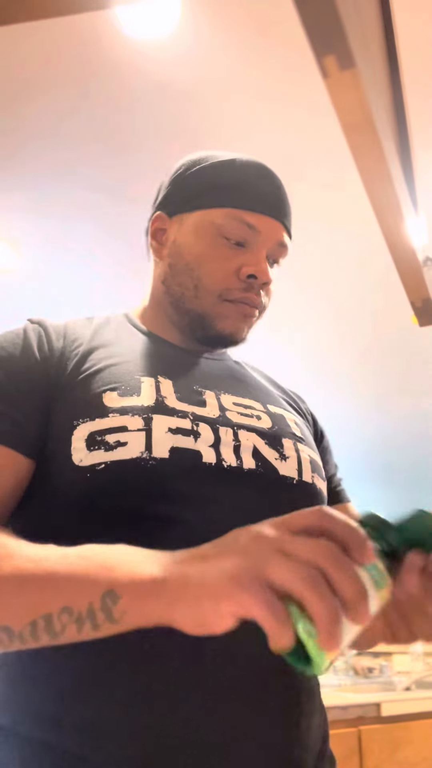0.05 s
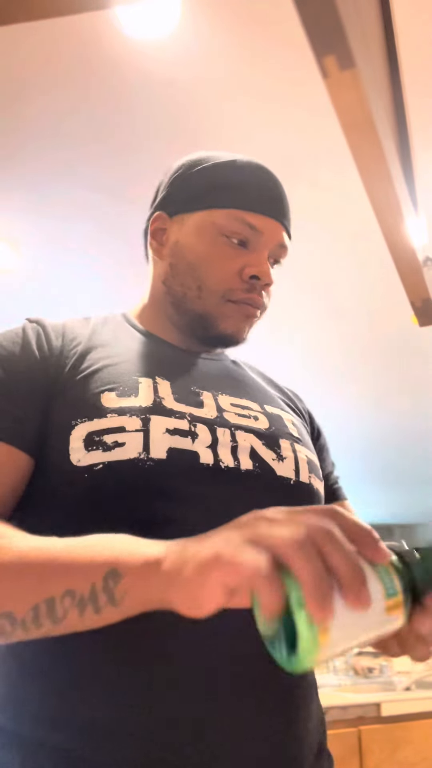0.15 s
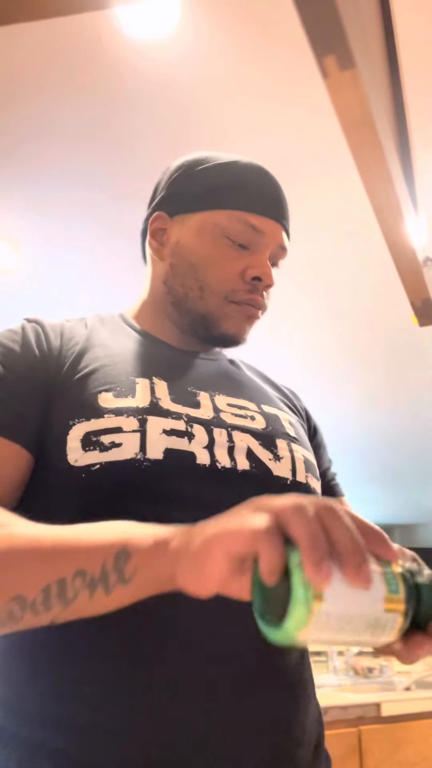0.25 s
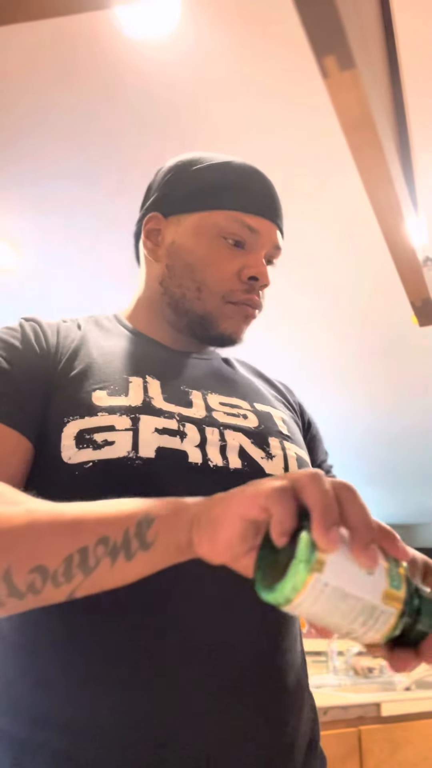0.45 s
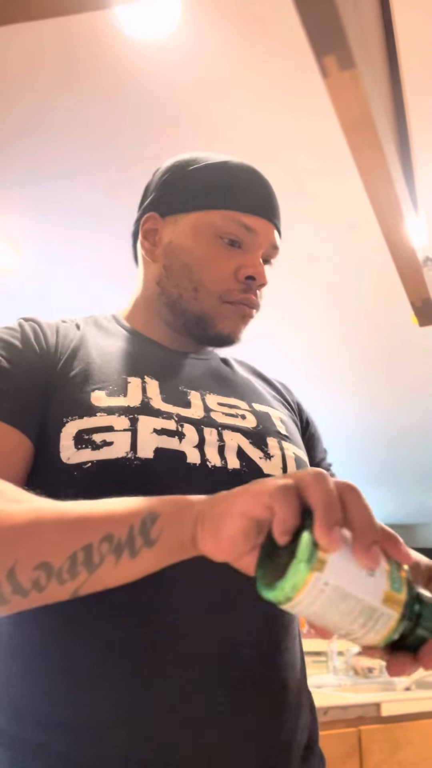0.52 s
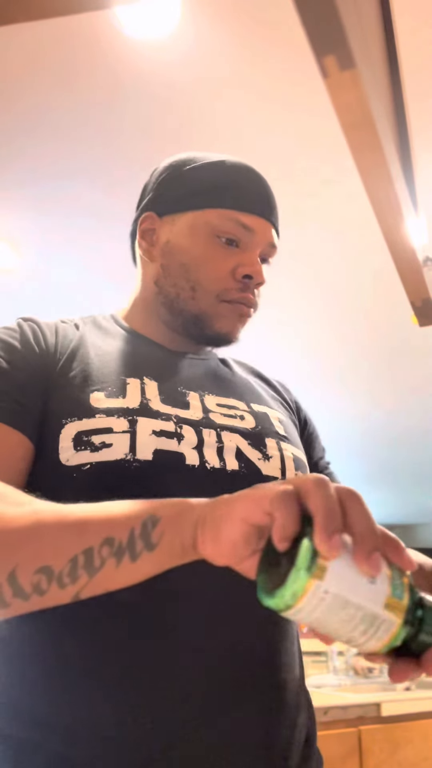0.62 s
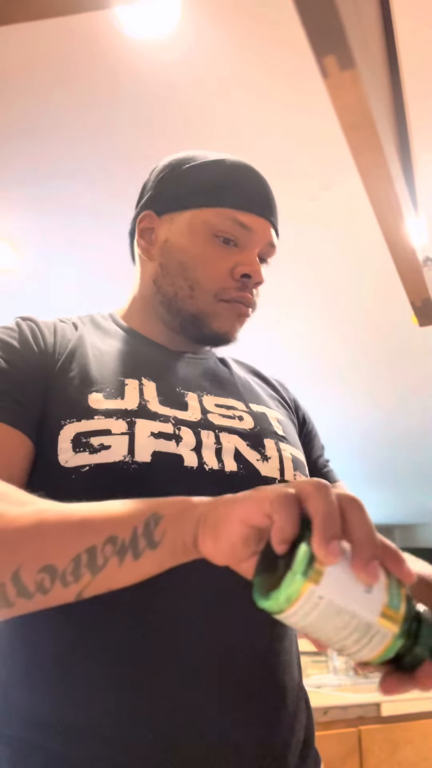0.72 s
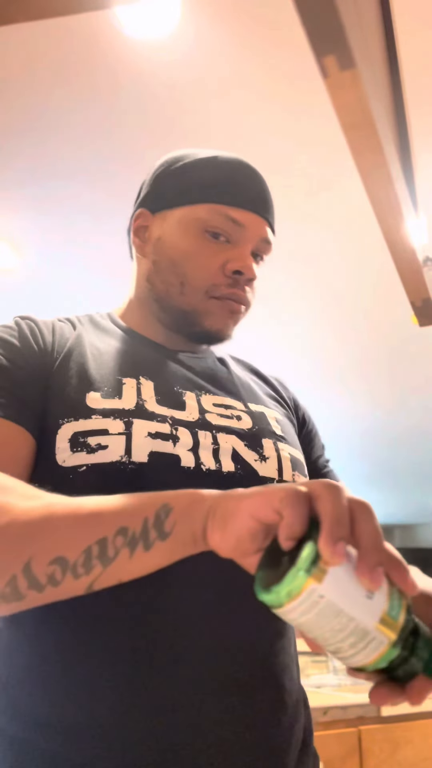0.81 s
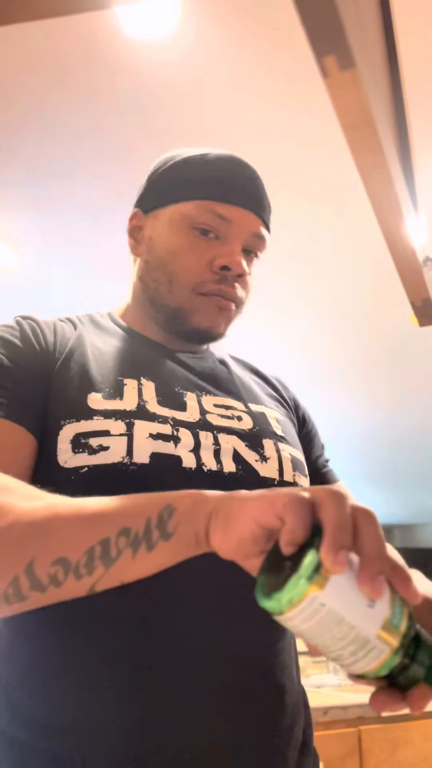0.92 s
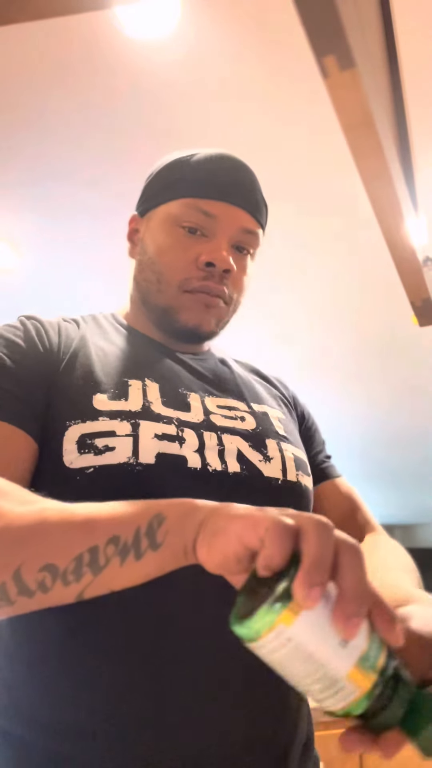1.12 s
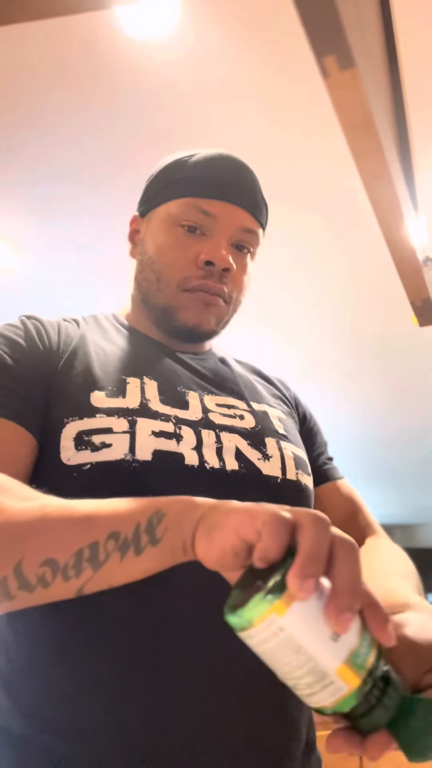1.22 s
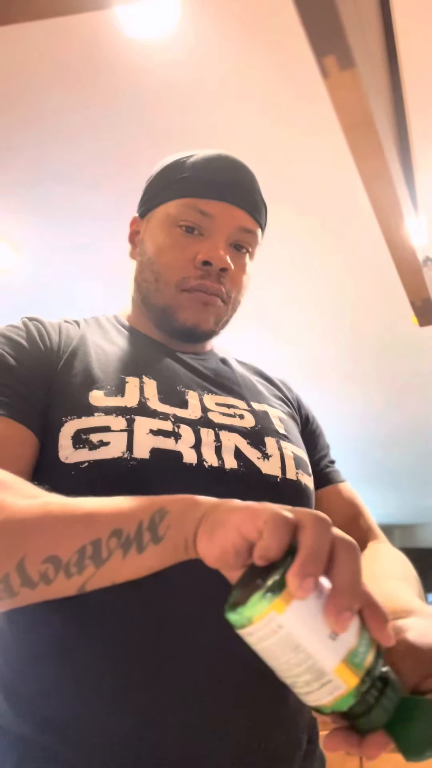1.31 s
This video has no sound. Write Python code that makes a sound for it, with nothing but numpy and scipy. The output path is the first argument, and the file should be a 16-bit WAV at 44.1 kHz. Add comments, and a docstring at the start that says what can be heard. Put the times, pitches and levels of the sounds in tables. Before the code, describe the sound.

Tablets rattle and clatter down inside a plastic bottle, then a few last ones tick out

```python
"""Tablets tipped from a plastic bottle

A pill bottle is uncapped and tipped in a kitchen, close to a pair of microphones, over a low rumble of shaped noise.
The rubbing cap sets the hollow bottle humming: two narrow gliding notes.
Tablets slide and knock down the wall, then a last few drop out: clicks excite cracks, ticks and decaying modes.
A hand rubs the bottle (grainy noise) and bumps it once (a low sine and low noise)."""
import sys
import numpy as np
from scipy import signal
from scipy.fft import rfft, irfft
from scipy.io import wavfile
from scipy.ndimage import uniform_filter1d

SR = 44100
rng = np.random.default_rng(int(sys.argv[2]) if len(sys.argv) > 2 else 0)


def write(x):
    x = np.atleast_2d(x).T
    wavfile.write(sys.argv[1], SR, np.round(np.clip(x, -1, 1) * 32767).astype(np.int16))


N = 59535  # length in samples

# Spectrum of the room rumble: frequency_hz, relative_density_db
RUMBLE_SPECTRUM = [(20,-17.5),(40,-8),(60,1.5),(90,-0.5),(125,-12.5),(160,-20),(200,-8.5),(250,-34.5),(450,-17.5),(1000,-45.5),(2500,-39),(9000,-38.5),(16000,-68.5)]
RUMBLE_DB = -60.5

# Levels of the two notes of the rubbing cap: time_s, low_note_db, high_note_db
CAP_LEVELS = [(0,-50,-51.5),(.075,-48.5,-41.5),(.1,-61,-66),(.17,-64,-66),(.21,-61.5,-41),(.285,-55,-34.5),(.35,-60,-40.5),(.42,-94.5,-80.5)]
# The two notes, low then high: start_pitch_hz, glide_hz_per_s, linewidth_hz
CAP_NOTES = [(476,-81,3.1),(1812,105,2.6)]

# Skin rubbing on the bottle: time_s, level_db
RUB_LEVEL = [(0,-49),(.09,-58.5),(.85,-72.5),(.92,-54.5),(.98,-53.5),(1.05,-53),(1.12,-46.5),(1.22,-53.5),(1.275,-60.5),(1.33,-50)]
# Spectrum of the rub: frequency_hz, relative_density_db
RUB_SPECTRUM = [(200,-24),(320,0),(520,-1.5),(750,2),(1000,-6.5),(1500,3),(2300,-2.5),(2900,-6.5),(6000,-24),(16000,-38.5)]
# Spectrum of the noise in the bump: frequency_hz, relative_density_db
PUFF_SPECTRUM = [(30,2),(90,2),(160,-8),(300,-11),(520,-8.5),(900,-53)]
BUMP_S, BUMP_RISE_S, BUMP_HZ = 0.948, 0.016, 78  # onset, time from onset to peak, pitch
BUMP_DB, BUMP_PUFF_DB = -48, -48  # sine and noise parts

# Small tablets sliding over each other: time_s, relative_level_db
SLIDE_LEVEL = [(0,-55),(.07,-50),(.1,-67),(.17,-51),(.235,-43),(.255,-30.5),(.31,-24),(.365,-26.5),(.41,-18),(.46,-25),(.51,-25),(.57,-36),(.72,-44),(.78,-50),(1.07,-69),(1.09,-37),(1.13,-66)]
SLIDE_PER_S, SLIDE_SPREAD_DB, SLIDE_DB = 340, 1.3, -2
SLIDE_TREBLE_DB, SLIDE_TICK_HZ = -10, 3500

# Tablet knocks: start_s, relative_level_db, relative_treble_db, tick_pitch_hz
KNOCKS = [(.015,-38,-7,3770),(.0362,-22.5,-4,3650),(.0516,-23,1,3915),(.1775,-32,-14,3770),(.2034,-24.5,-11,3700),
          (.2418,-13.5,-1.5,3570),(.2618,-15,3,4130),(.275,-17,3,3540),(.2995,-13.5,1,3730),(.305,-16.5,4,3602),(.316,-18,-9,3630),(.3444,-10,7.5,5500),
          (.3855,-21,3.5,3400),(.398,-12.5,-1,3700),(.4055,-11.5,5,4325),(.410,-12.5,0.5,3310),(.4212,-6.5,-1.5,3570),(.427,-17,-9,4620),(.4633,-12,-8,2360),(.4823,-14,-12.5,3660),
          (.5387,-16,-6,2540),(.5546,-14.5,2,2340),(.5891,-23.5,3,5050),(.6095,-20,0,2473),(.633,-20,-7,3570),(.6384,-16,-1.5,2515),(.6645,-29,-15,4100),(.686,-12,7.5,4280),(.7148,-23,-6,2550),(.756,-34.5,-21,2500),
          (.8724,-36,-6,2230),(.9126,-37,-6,1860),(1.0111,-40,-3.5,3500),(1.0742,-30,-9,3375),(1.1196,-21,0.5,3640),(1.1466,-31.5,-2,3500),(1.1715,-38,3.5,4400),(1.1924,-30,-6,3730),(1.2332,-36,-12,3670)]
KNOCK_DB, TREBLE_DB, AIR_DB, WALL_DB = -5.5, -8.5, -10, -7.5
TICK_DB, TICK_DECAY_S = 1.5, 0.0024  # decay times here and below are to 1/e
RISE_S, CRACK_S, SHELL_S, SHELL_DB = 0.0011, 0.0017, 0.011, -7
TREBLE_CRACK_S, TREBLE_SHELL_S, TREBLE_SHELL_DB = 0.0021, 0.0074, -4
# Spectrum of the body of a knock: frequency_hz, relative_density_db
BODY_SPECTRUM = [(100,-59),(230,-29),(350,-14.5),(590,-15),(800,-6.5),(1050,-10),(1350,-5),(1620,-8.5),(2300,4),(2850,1),(3600,2),(4500,-1),(5000,-4.5),(6500,-3.5),(7600,-6),(10000,-33.5),(16000,-31.5)]
# Spectrum of the treble of a knock: frequency_hz, relative_density_db
TREBLE_SPECTRUM = [(100,-55),(3000,-17.5),(6000,5),(8000,0.5),(9700,3),(10400,-2.5),(11800,-9.5),(13200,-4),(15600,-12.5),(16500,-29.5)]
# Hollow tint of the closed bottle: frequency_hz, gain_db
CLOSED_TINT = [(750,-0.5),(1000,-3.5),(1380,4),(2700,-3),(3500,-0.5)]
# Modes of the air in the capped bottle: nominal_pitch_hz, relative_level_db, t60_s
CAPPED_AIR = [(480.4,-14,0.04),(762,-24,0.018),(1855.2,4.5,0.077)]
# Modes of the air in the open bottle: nominal_pitch_hz, relative_level_db, t60_s
OPEN_AIR = [(351.6,-14.5,0.049),(1860,-1,0.026),(2233,3.5,0.036)]
# Modes of the plastic wall: nominal_pitch_hz, relative_level_db, t60_s
WALL = [(2336,0,0.06),(2610,1,0.07),(3146,-1,0.098),(3570,0.86,0.024),(3738,1,0.055),(4100,-1,0.036)]
OPEN_S, SWELL_S = 0.38, 0.0018  # when the cap comes off; build-up time of a mode
GRIP_S, GRIP_DB = 0.82, -14  # when the hand closes round the bottle; its change to the shell ring

# Reverberation time of the kitchen: frequency_hz, t60_s
KITCHEN_DECAY = [(250,0.5),(700,0.28),(1800,0.23),(4500,0.17),(9000,0.25),(15000,0.2)]
# Spectrum of the reflections: frequency_hz, relative_gain_db
ROOM_SPECTRUM = [(300,3),(1000,2),(2500,3.5),(5000,-3.5),(9000,-5),(15000,-3)]
ROOM_DB, ROOM_GAP_S = -9, 0.0017  # level; silence before the first reflection

# Likeness of the two microphone signals: frequency_hz, coherence (no unit, limited to 0..1 in use)
LIKENESS = [(80,1),(200,0.52),(900,1),(2000,0.92),(4000,0.32),(9500,1),(12000,1.5052)]
# Phase by which the left leads, faded out in the bass: frequency_hz, phase_rad
LEAD = [(350,1.12),(900,-2),(1250,-1.2),(2000,-1.5),(2850,-3),(3600,-6),(6500,-5),(8300,-3.5),(10900,-2.5),(12400,0.45)]
# Left minus right: frequency_hz, level_difference_db
BALANCE = [(110, 0.45), (380, 1.9), (700, 0.3), (1290, 5.7), (4400, 1)]
MONO_HZ = 250  # the phase lead fades out below this
EDGE_HZ = 16200


def amp(db):
    """Decibel law: an amplitude ratio is ten to the power db / 20."""
    return 10 ** (np.asarray(db) / 20)


def unit(x):
    """Normalisation: a signal divided by its effective value has rms 1."""
    return x / np.sqrt(np.mean(x ** 2) + 1e-20)


def read(points, hz):
    """Logarithmic frequency scale: a table is interpolated along log frequency."""
    f, value = np.transpose(points)
    return np.interp(np.log(hz + 1), np.log(f + 1), value)


def level(points, t):
    """Envelope: a level curve in dB, interpolated in time, becomes a gain."""
    return amp(np.interp(t, *np.transpose(points)))


def add(mix, s, sound):
    """Superposition: a sound starting at time s is summed into the mix."""
    part = mix[..., max(0, round(s * SR)):][..., :sound.shape[-1]]
    part += sound[..., :part.shape[-1]]


def colour(x, *spectra, size=4096):
    """Minimum-phase filtering: the product of the spectra fixes a causal response, scaled to unit energy."""
    hz = abs(np.fft.fftfreq(size, 1 / SR))
    log_gain = np.log(amp(sum(read(points, hz) for points in spectra)))
    response = np.exp(np.conj(signal.hilbert(log_gain)))
    taps = np.fft.ifft(response).real[:size // 2]
    return signal.fftconvolve(x, taps[None] / np.linalg.norm(taps), axes=1)[:, :N]


def rumble():
    """Stationary noise: the room is a random signal weighted towards low frequencies."""
    return amp(RUMBLE_DB) * unit(colour(rng.standard_normal((2, N)), RUMBLE_SPECTRUM))


def twist():
    """Friction-driven resonance: the cap sustains a low note that sags and fades, a high one that creeps up and swells."""
    t, curve, notes = np.arange(N) / SR, np.array(CAP_LEVELS), np.zeros((2, N))
    for (hz, glide, width), dbs in zip(CAP_NOTES, curve.T[1:]):
        # a random walk of the phase widens the spectral line
        jitter = rng.standard_normal(N) * np.sqrt(2 * np.pi * abs(width) / SR)
        phase = np.cumsum(2 * np.pi * (hz + glide * t) / SR + jitter)
        gain = amp(np.interp(t, curve[:, 0], dbs))
        notes += gain * np.array([np.cos(phase), -np.sin(phase)])
    return notes


def hand_rub():
    """Friction noise: skin on plastic is coloured noise with a random, grainy strength."""
    grain = amp(3.8 * unit(uniform_filter1d(rng.standard_normal(N), size=300)))
    noise = grain * rng.standard_normal((2, N))
    return level(RUB_LEVEL, np.arange(N) / SR) * unit(colour(noise, RUB_SPECTRUM))


def hand_bump():
    """Soft impact: a gradual push gives a low sine and low noise that swell and die together."""
    since = np.arange(N) / SR - BUMP_S
    u = np.maximum(since, 0) / BUMP_RISE_S
    tone = amp(BUMP_DB) * np.sin(2 * np.pi * BUMP_HZ * since)
    puff = amp(BUMP_PUFF_DB) * colour(rng.standard_normal((2, N)), PUFF_SPECTRUM)
    return u * np.exp(1 - u) * (tone + puff)


def slide(count=900):
    """Granular flow: a sliding heap of tablets is a dense series of small random hits."""
    place, size, pitch = rng.random((count, 3)).T
    times = (np.arange(count) + 2 * place) / SLIDE_PER_S
    spread = SLIDE_SPREAD_DB * (np.minimum(-np.log(size), 3) - 1)
    dbs = np.interp(times, *np.transpose(SLIDE_LEVEL)) + SLIDE_DB + spread
    pitches = SLIDE_TICK_HZ * 2 ** (pitch - .5)  # within half an octave either way
    return [(s, db, SLIDE_TREBLE_DB, hz) for s, db, hz in zip(times, dbs, pitches) if s < N / SR]


def train(times, dbs):
    """Impulse excitation: each contact is a one-sample click of given size and time."""
    places = np.clip(np.round(times * SR).astype(int), 0, N)
    return np.bincount(places, amp(dbs), N + 1)[:N]


def crack(clicks, crack_s, shell_s, shell_db):
    """Two-stage decay: noise gives each contact a sharp crack and a brief, dense shell ring, never twice the same."""
    t = np.arange(SR // 20) / SR
    after = np.maximum(t - RISE_S, 0)
    decay = np.hypot(np.exp(-after / crack_s), amp(shell_db) * np.exp(-after / shell_s))
    shape = np.minimum(t / RISE_S, 1) ** 2 * decay
    energy = abs(signal.fftconvolve(clicks ** 2, shape ** 2)[:N])  # energies of the hits add
    return np.sqrt(energy) * rng.choice([-1., 1.], (2, N))


def vary(x, patchy_db):
    """Local response: each spot of the shell has its own colour, so hits differ in tint while the strength stays."""
    z = signal.stft(x, nperseg=256)[2]
    patches = uniform_filter1d(rng.standard_normal(z.shape[1:]), size=5, axis=0)
    patches = unit(uniform_filter1d(patches, size=7, axis=1))
    tinted = z * amp(patchy_db * patches)
    keep = np.linalg.norm(z, axis=(0, 1)) / (np.linalg.norm(tinted, axis=(0, 1)) + 1e-20)
    return signal.istft(tinted * keep, nperseg=256)[1][:, :N]


def ticks(hits):
    """Damped oscillation: each tablet gives a very short tick at a pitch of its own."""
    t, out = np.arange(SR // 50) / SR, np.zeros((2, N))
    shape = np.minimum(t / RISE_S, 1) ** 2 * np.exp(-t / TICK_DECAY_S)
    for s, db, _, hz in hits:
        add(out[0], s, amp(db + TICK_DB) * shape * np.sin(2 * np.pi * hz * t))
    return out


def ring(clicks, modes, detune, count=6):
    """Modal superposition: clicks landing on several spots ring decaying modes, each spot tuned a little differently."""
    t = np.arange(SR // 6) / SR
    spot, out = rng.integers(0, count, N), np.zeros((2, N))
    for k in range(count):
        tone = np.zeros(len(t), complex)
        for hz, db, t60 in modes:
            tuned_hz = hz * (1 + detune * rng.uniform(-1.02, 1))
            mode = np.exp((2j * np.pi * tuned_hz - np.log(1000) / t60) * t)
            tone += amp(db) * mode * rng.choice([-1, 1])
        tone *= 1 - np.exp(-(t / SWELL_S) ** 2)
        clicks_here = (clicks * (spot == k))[None]
        out += signal.fftconvolve(clicks_here, np.array([tone.imag, tone.real]), axes=1)[:, :N]
    return out


def tablets(hits):
    """Impact on a cavity: hits tick, crack the shell and ring wall and air, whose notes change as the cap comes off."""
    s, db, treble_db, _ = np.transpose(hits)
    t = np.arange(N) / SR
    capped, gripped = t < OPEN_S, t > GRIP_S
    closed = capped | gripped  # the palm tints the crack as the cap did; the air modes stay open
    blows = train(s, db)
    shut = crack(blows * capped, CRACK_S, SHELL_S, SHELL_DB)
    shut = shut + crack(blows * gripped, CRACK_S, SHELL_S, SHELL_DB + GRIP_DB)
    unshut = crack(blows * ~closed, CRACK_S, SHELL_S, SHELL_DB)
    body = colour(shut, BODY_SPECTRUM, CLOSED_TINT) + colour(unshut, BODY_SPECTRUM)
    treble_blows = train(s, db + treble_db + TREBLE_DB)
    treble = colour(crack(treble_blows, TREBLE_CRACK_S, TREBLE_SHELL_S, TREBLE_SHELL_DB), TREBLE_SPECTRUM)
    wall = amp(WALL_DB) * ring(blows, WALL, detune=0.023) / np.sqrt(len(WALL))
    air = ring(blows * capped, CAPPED_AIR, detune=0.011) + ring(blows * ~capped, OPEN_AIR, detune=.05)
    return amp(KNOCK_DB) * (vary(body + treble, patchy_db=3) + ticks(hits) + wall + amp(AIR_DB) * air)


def kitchen(x):
    """Reverberation: dense reflections are noise in which each band decays at its own rate."""
    hz, t, z = signal.stft(rng.standard_normal((2, SR // 2)), SR, nperseg=256)
    decay = np.exp(-np.log(1000) * t / read(KITCHEN_DECAY, hz)[:, None])
    tail = signal.istft(z * decay, SR, nperseg=256)[1]
    tail = tail * (np.arange(tail.shape[1]) / SR > ROOM_GAP_S)
    wet = signal.fftconvolve(x, tail / np.linalg.norm(tail[0]), axes=1)[:, :N]
    return colour(wet, ROOM_SPECTRUM)


def pair(x):
    """Partial coherence: two microphones share one part of the field and differ in another, in phase and in level."""
    size = 2 ** int(np.ceil(np.log2(N)))
    hz = np.fft.rfftfreq(size, 1 / SR)
    shared, unshared = rfft(x, size)
    same = np.clip(read(LIKENESS, hz), 0, 1)
    lean = amp(read(BALANCE, hz) / 2)
    lead = read(LEAD, hz) * np.tanh((hz / MONO_HZ) ** 2)
    right = (same * shared + np.sqrt(1 - same ** 2) * unshared) * np.exp(-1j * lead)
    return irfft(np.array([shared * lean, right / lean]))[:, :N]


def scene():
    """Superposition: rumble, cap, hand and reverberant tablets add at the microphone pair."""
    quiet = rumble() + twist() + hand_rub() + hand_bump()
    rattle = tablets(KNOCKS + slide())
    return pair(rattle + amp(ROOM_DB) * kitchen(rattle) + quiet)


def record(dry):
    """Band limitation: the recorder passes only frequencies below its upper edge."""
    low_pass = signal.firwin(511, EDGE_HZ, window=("kaiser", 9), fs=SR)
    return signal.oaconvolve(dry, low_pass[None], "same")


dry = scene()
out = record(dry)
write(out)
```